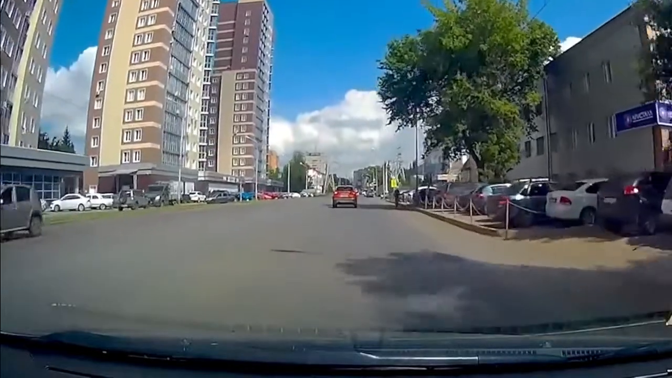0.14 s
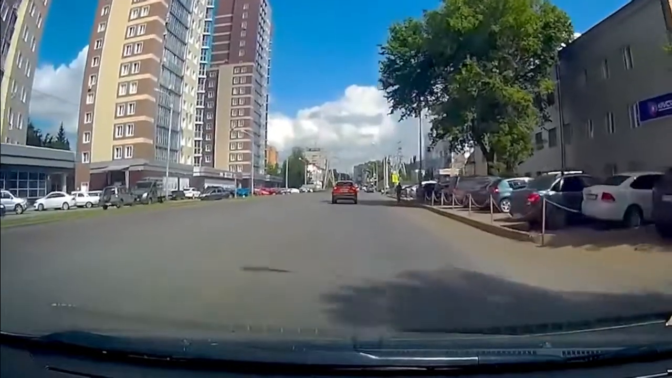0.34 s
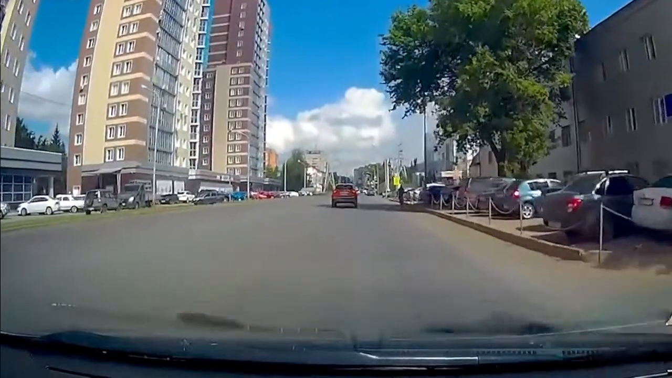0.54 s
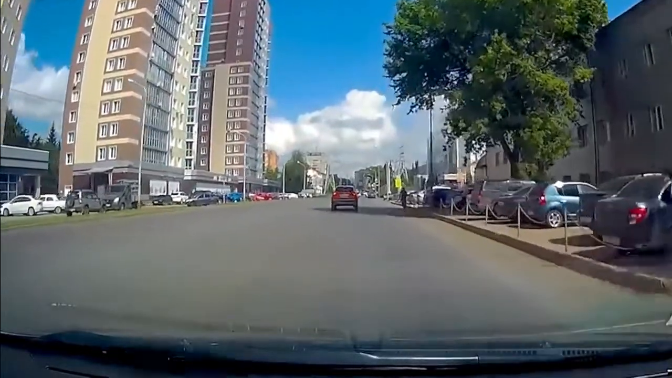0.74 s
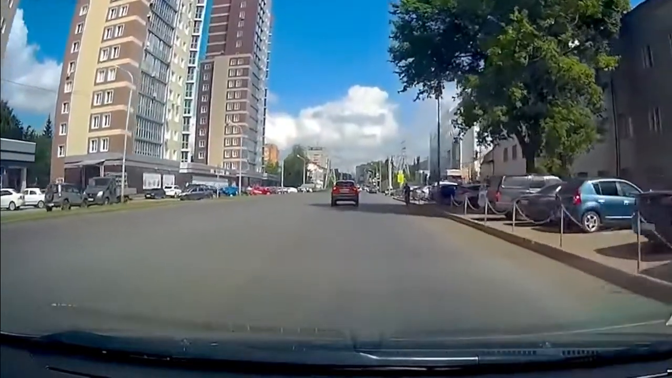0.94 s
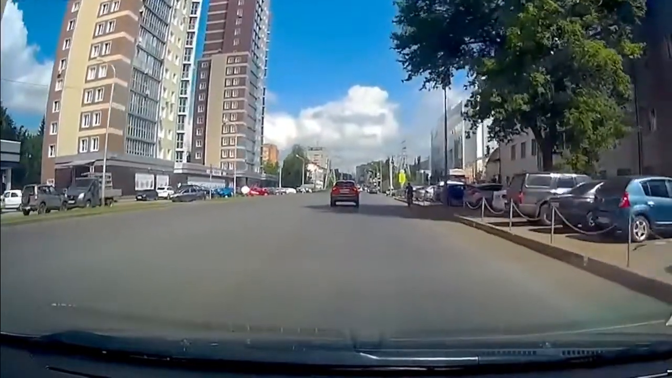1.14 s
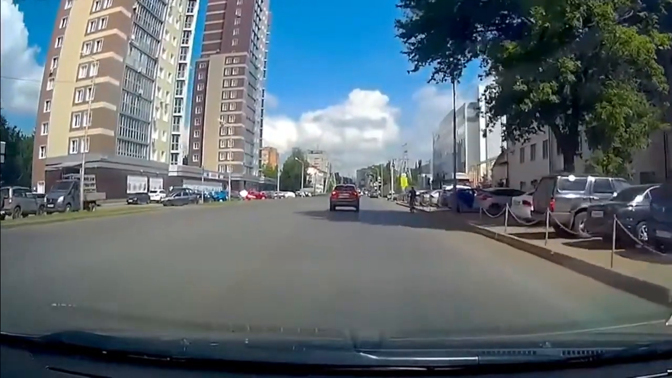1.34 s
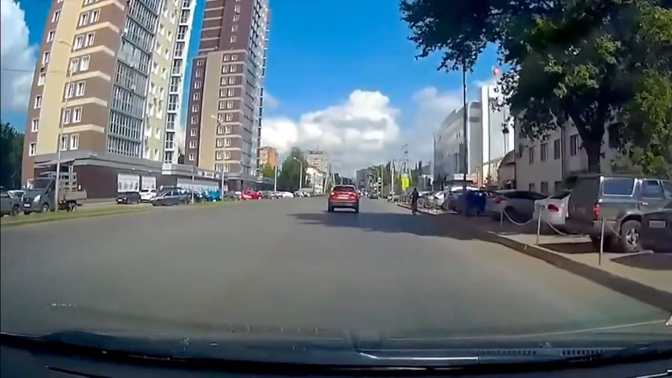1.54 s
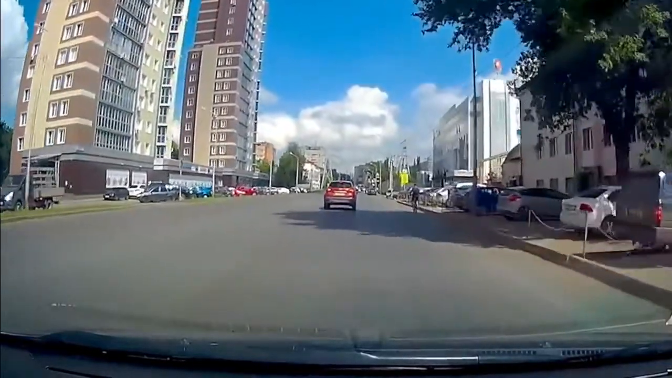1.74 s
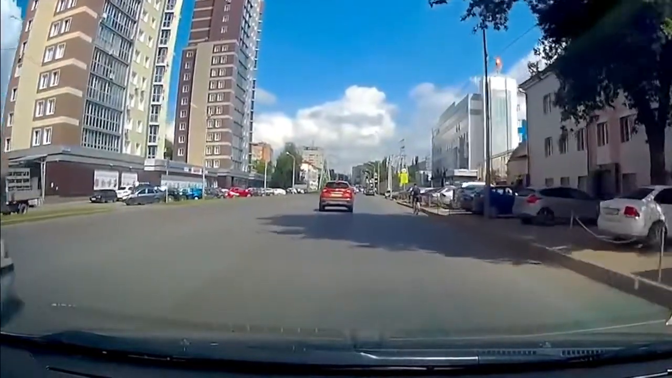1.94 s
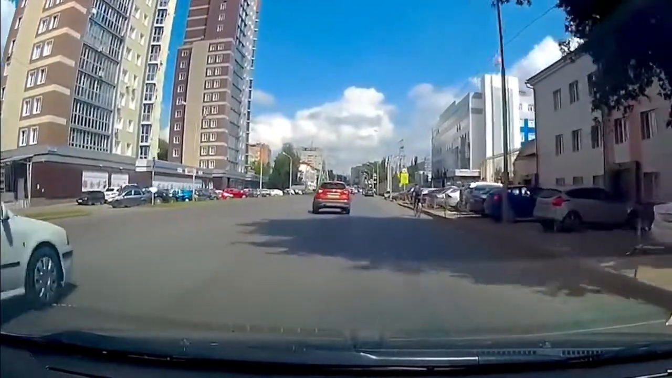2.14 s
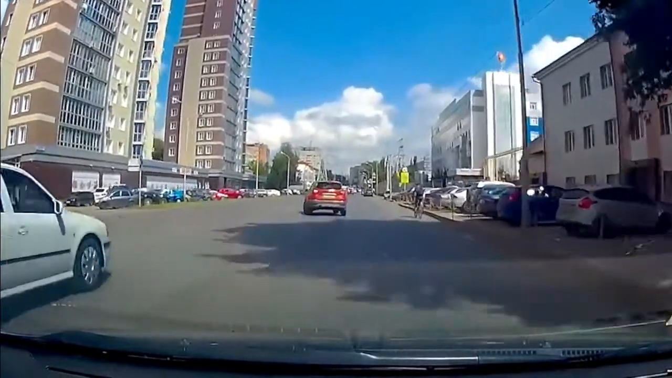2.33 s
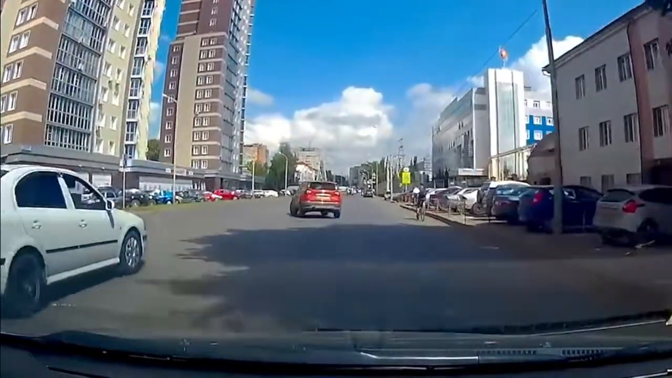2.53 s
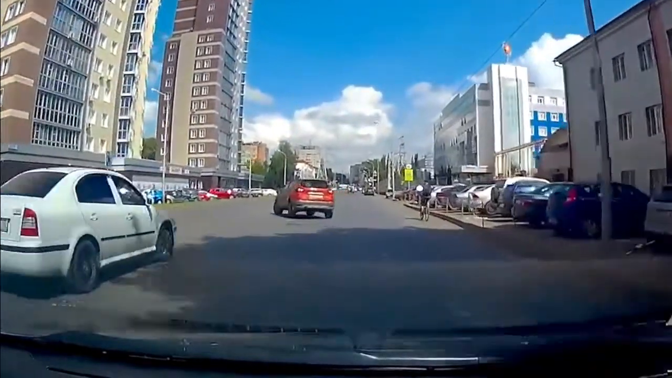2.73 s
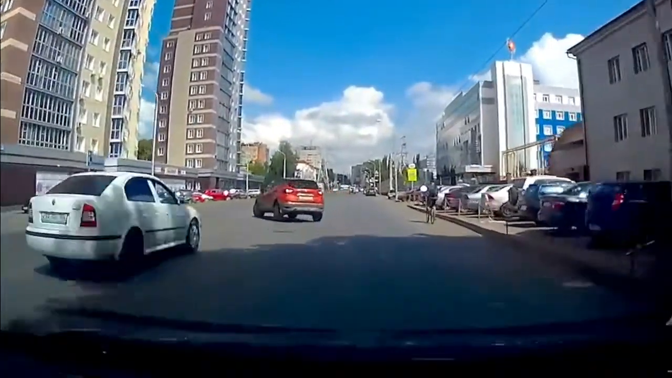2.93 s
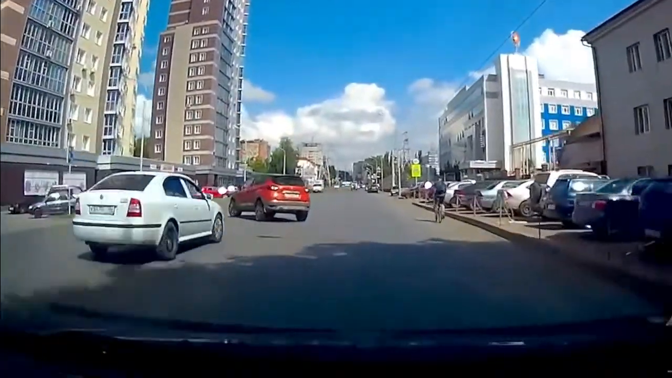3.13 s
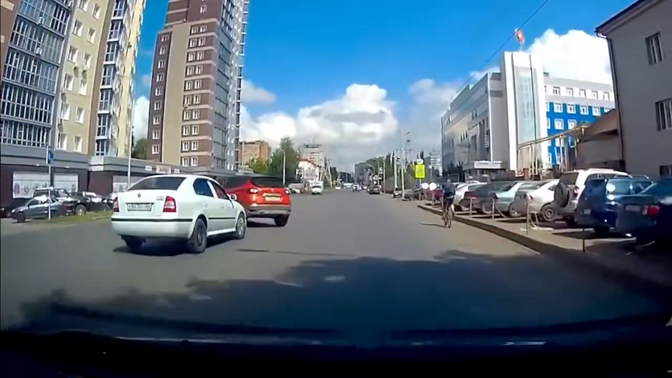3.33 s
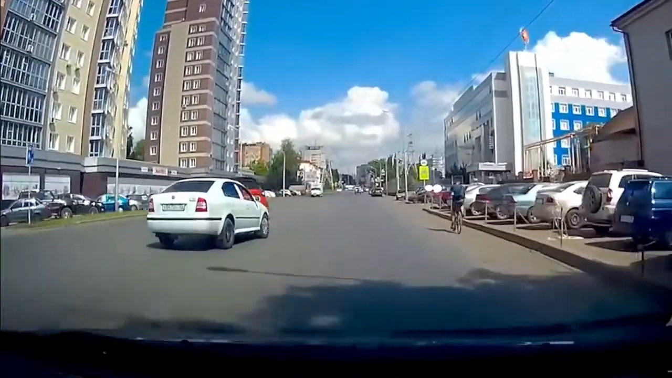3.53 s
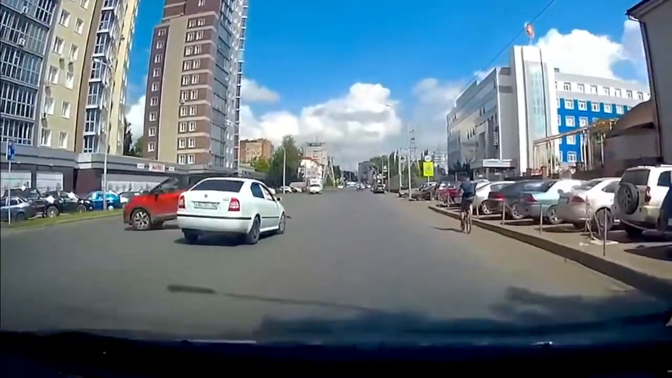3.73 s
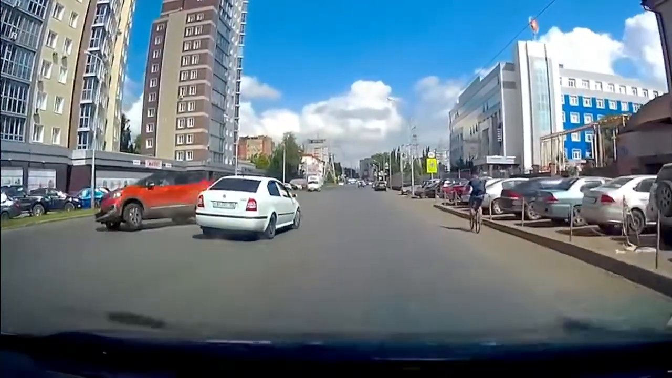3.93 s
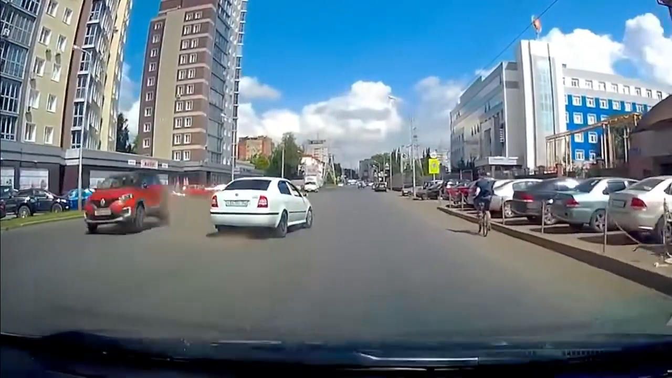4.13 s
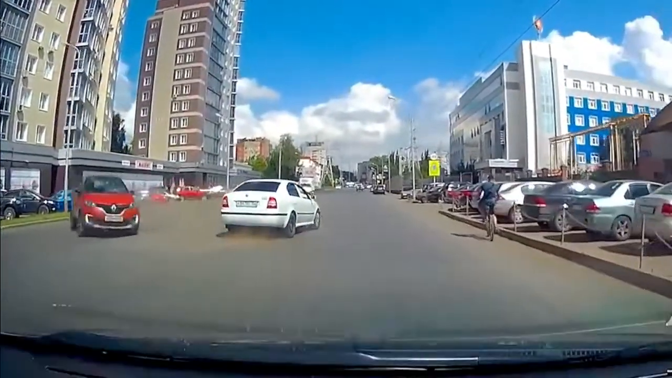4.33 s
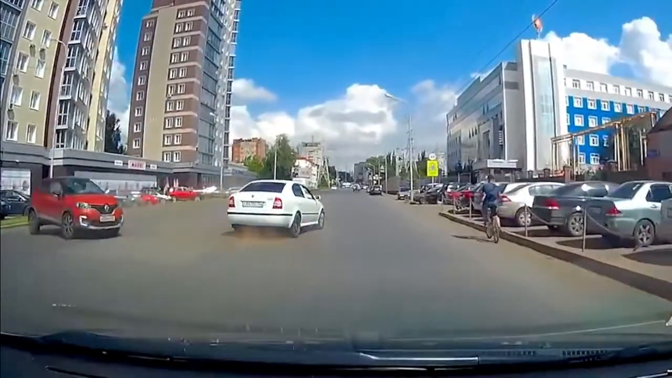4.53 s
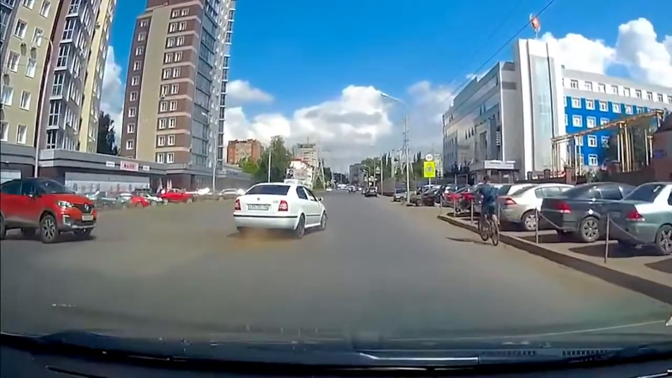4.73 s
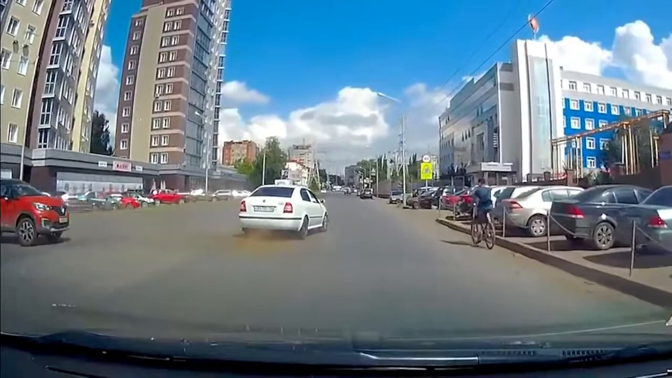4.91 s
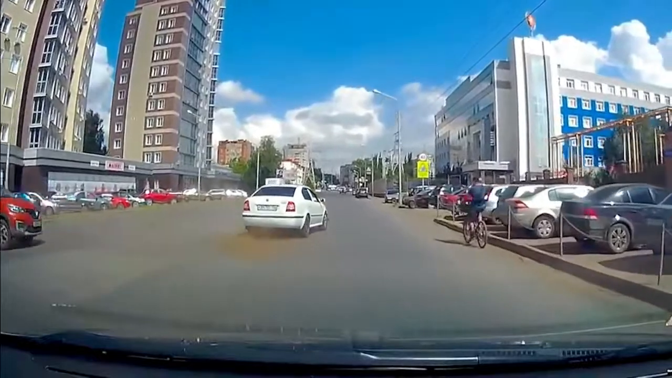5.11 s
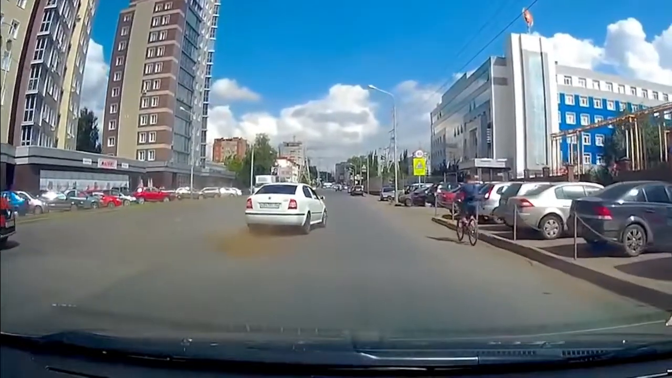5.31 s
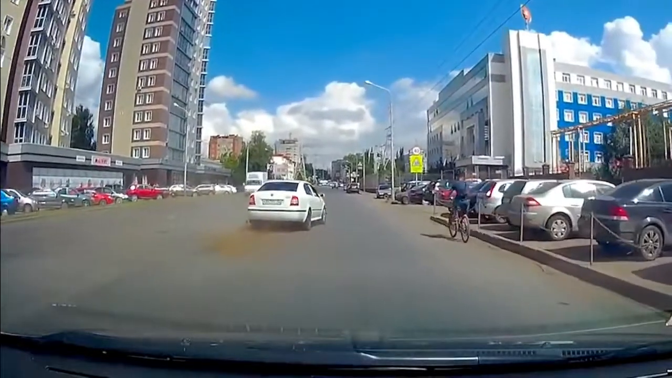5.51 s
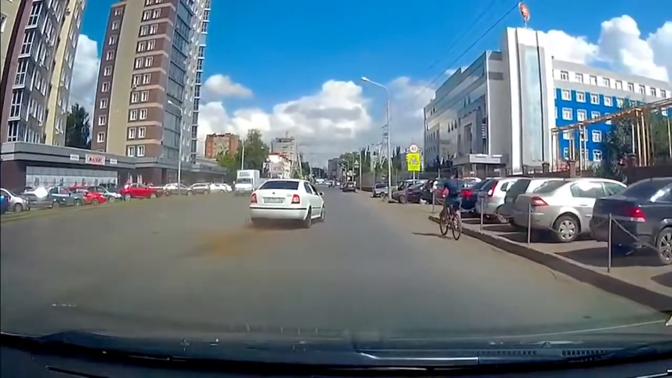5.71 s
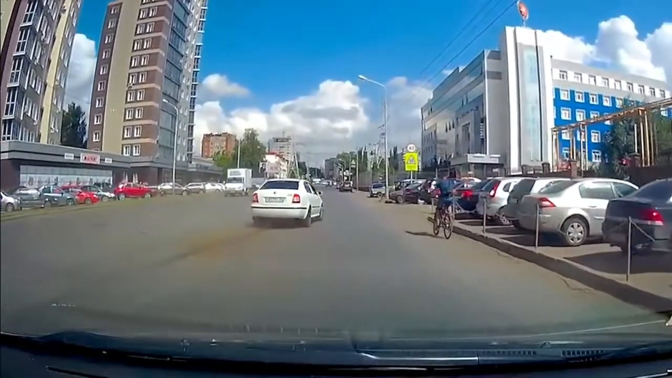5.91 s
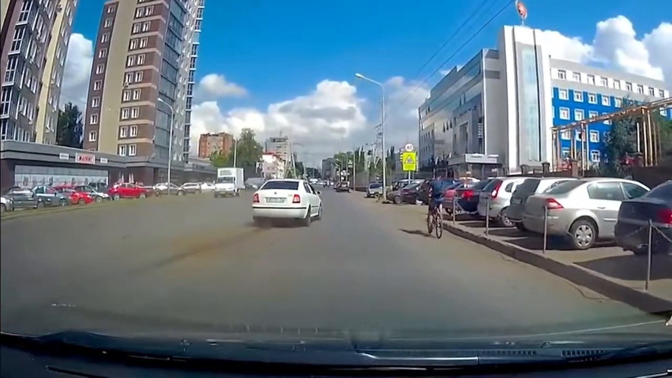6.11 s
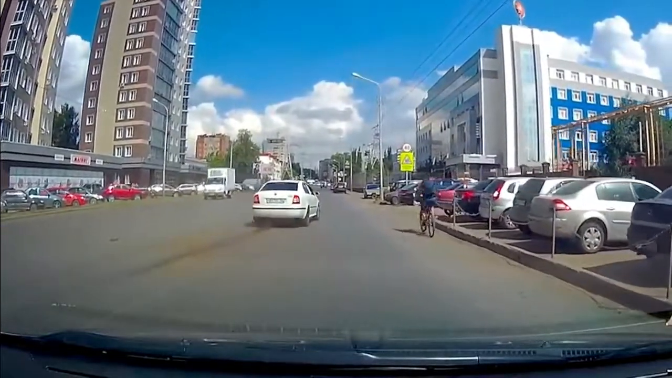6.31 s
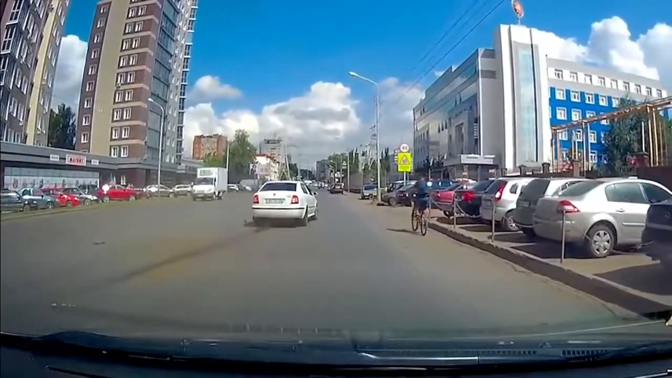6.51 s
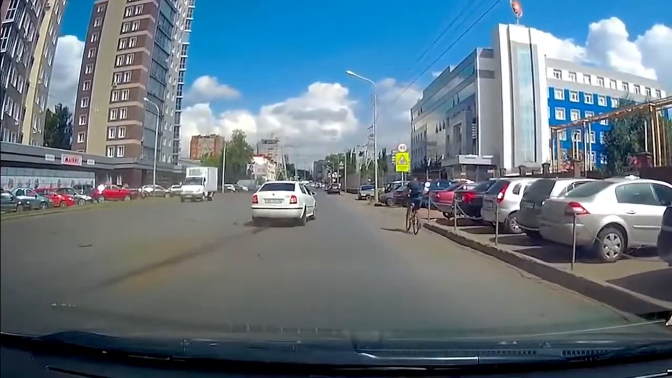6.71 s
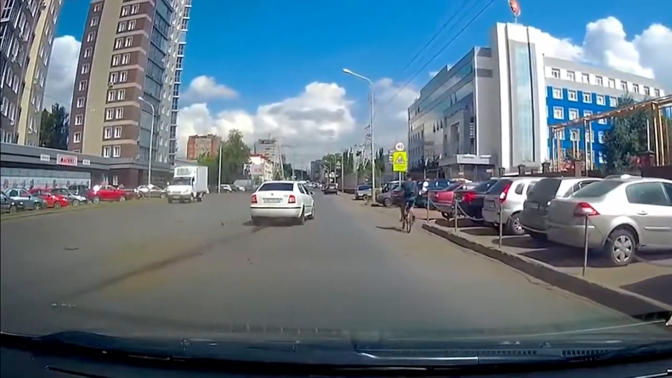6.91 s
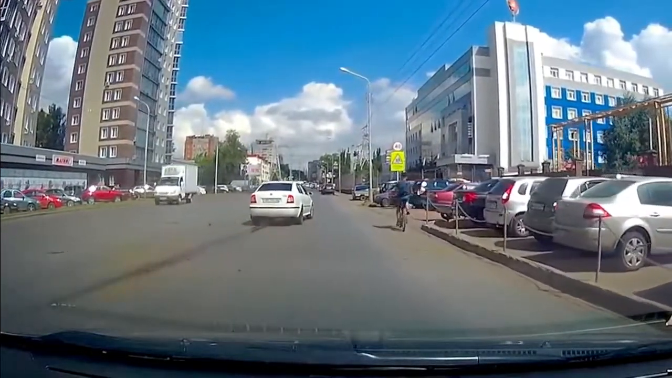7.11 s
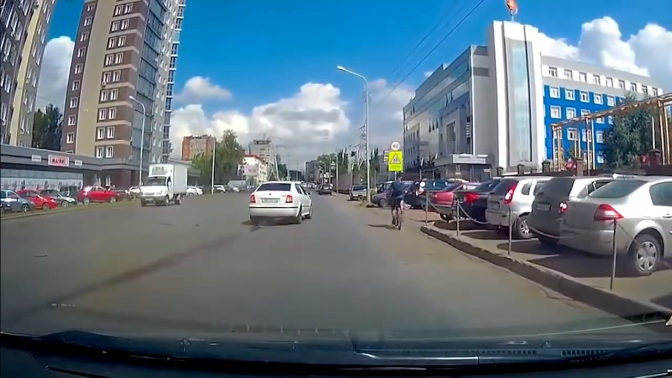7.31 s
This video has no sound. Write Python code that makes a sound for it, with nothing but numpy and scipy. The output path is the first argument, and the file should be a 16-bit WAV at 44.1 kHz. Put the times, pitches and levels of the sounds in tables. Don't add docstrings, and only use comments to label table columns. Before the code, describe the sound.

City street through a windscreen. Steady cabin boom and road noise swell as another car passes, then a thin high squeal leads straight into a heavy crunching impact. Rough, wavering tyre shrieks follow as a car spins, with small fragments clattering and ringing over the road. A last skid fades; our road noise drops to a soft idle, microphone hiss and a faint pulsing brake whine.

```python
import sys
import numpy as np
from scipy import signal
from scipy.fft import rfft, irfft, next_fast_len
from scipy.io import wavfile
from scipy.ndimage import uniform_filter1d, map_coordinates

SR = 44100
rng = np.random.default_rng(int(sys.argv[2]) if len(sys.argv) > 2 else 0)


def to_wav(s):
    ch = np.atleast_2d(s).T
    pcm = np.round(np.clip(ch, -1, 1) * 32767)
    wavfile.write(sys.argv[1], SR, pcm.astype(np.int16))


def linear_from_db(decibels):
    return 10 ** (np.asarray(decibels, float) / 20)


N = 324261

# start_s, pitch_hz, level_db
LOCKED_TYRES = [
    [(3.22, 2170, -52), (3.26, 2070, -41), (3.31, 2000, -39), (3.37, 1960, -39.5), (3.42, 1870, -39),
     (3.5, 1880, -46), (3.68, 1920, -51)],
    [(3.245, 1780, -43), (3.3, 1700, -38), (3.36, 1620, -37), (3.44, 1620, -37.5), (3.52, 1590, -45),
     (3.68, 1630, -48)],
    [(5.0, 1068, -35), (5.13, 1100, -29), (5.24, 1125, -31), (5.32, 1100, -38), (5.6, 1114, -51),
     (5.95, 1101, -62)],
]
# second_partial_db, pitch_scatter_share
LOCKED_TONES = [(-9, .048), (-30, .034), (-30, .06)]
# start_s, length_s, first_hz, last_hz, level_db
SHRILL_CHIRPS = [(3.875, .06, 1100, 1035, -36), (3.925, .05, 1120, 1080, -41), (3.96, .07, 625, 680, -36),
                 (4.15, .07, 640, 670, -31), (4.18, .095, 860, 805, -30), (4.235, .125, 790, 840, -28),
                 (4.53, .065, 845, 890, -33)]
HARSH_CHIRPS = [(4.09, .06, 790, 820, -27), (4.4, .13, 860, 900, -31), (4.02, .12, 690, 810, -30),
                (4.29, .06, 840, 860, -31), (4.355, .04, 1060, 1100, -30), (4.59, .15, 925, 1025, -21),
                (4.73, .085, 945, 915, -26), (4.86, .11, 950, 1050, -28)]
PURE_CHIRPS = [(3.585, .05, 607, 594, -42), (3.885, .03, 1050, 1040, -26), (3.96, .08, 1040, 1020, -27),
               (4.025, .105, 1035, 1050, -25), (4.345, .055, 1000, 1020, -23), (4.48, .1, 1055, 980, -25),
               (4.57, .2, 955, 1010, -19), (4.74, .08, 1070, 1050, -26), (4.845, .065, 945, 995, -23.5),
               (4.915, .055, 1020, 1060, -23), (4.95, .1, 1240, 1310, -31), (5.03, .09, 1290, 1170, -31),
               (5.1, .06, 1070, 1060, -27), (5.16, .1, 1110, 1140, -28)]
# start_s, length_s, first_hz, last_hz, level_db
THIN_CHIRPS = [(4.79, .09, 1065, 1105, -38), (4.95, .14, 1100, 1095, -39), (5.06, .18, 1105, 1135, -34)]
# pitch_hz, gain_db
WINDSCREEN = [(500, 2), (1000, 0.5), (1400, 3), (1700, 1), (2000, -5.5), (2230, 5.5), (2420, -5.5),
              (3220, 1.5), (3600, -5), (4000, 5), (4450, -5.5), (6000, -3)]
# pitch_hz, level_db_per_hz
SCRUB_LOW = [(420, -42.5), (560, -11), (680, -9.5), (820, 2), (950, -11.5), (1200, -57.5)]
SCRUB_HIGH = [(500, -47.5), (850, -23), (990, -2), (1050, 3.5), (1180, -7.5), (1320, -11), (1580, -21),
              (2190, -29.5), (2400, -47.5), (3120, -73.5), (5280, -120)]
# start_s, peak_db
BLOWS = [
    (3.698, -16),
    (3.707, -8),
    (3.711, -6),
    (3.737, -7),
    (3.751, -5),
    (3.778, -11),
    (3.784, -19),
    (3.799, -12),
    (3.822, -15),
]
# pitch_hz, level_db_per_hz
PANEL = [(35, -31), (60, 10), (86, -3), (182, 6.5), (209, -0.5), (295, -3), (409, -2), (449, -19),
         (501, -7), (695, -13), (788, -6), (1060, -5.5), (2500, -33.5), (3250, -62), (5500, -120)]
# pitch_hz, level_db_per_hz
SHATTER = [(1290, -35), (2200, -4), (2390, -10), (3280, -2), (3710, -6), (4030, -3.5), (4630, -14.5),
           (5960, -9), (6740, -20), (7320, -12.5), (8900, -24), (10100, -21.5), (15500, -40)]
# start_s, peak_db, hollow_knock_db
LANDINGS = [(2.929, -57, 6), (3.5874, -52, 18), (3.9788, -45.5, 14), (4.0596, -47.5, 17), (4.1592, -47, 9),
            (4.1797, -46, 13), (4.1953, -44.5, 12), (4.212, -47, 8), (4.3202, -49, 8), (4.3574, -46.5, 14),
            (4.375, -48, 10), (4.4448, -44, -1), (4.4587, -46, 12), (4.475, -48, 12), (4.5194, -47, 14),
            (4.627, -50, 12), (4.764, -47, 10), (4.781, -51, 5), (4.8302, -45, 6), (4.85, -49, 4),
            (4.935, -53, 4), (5.025, -50, 4), (5.0477, -49, 10), (5.074, -50, 4), (5.1303, -52, 2),
            (5.1914, -51, 4), (5.238, -51, -13), (5.257, -51, 0), (5.333, -49.5, -9), (5.4164, -51.5, -2),
            (5.454, -55.5, -2), (5.5354, -51, 23), (5.5928, -52, -7), (5.655, -58, 22), (5.7012, -53.5, 1),
            (5.715, -60, 26), (5.7474, -58.5, 24), (5.8315, -57, 1), (6.0314, -60, -2)]
# start_s, peak_db, pitch_hz
RINGING_PARTS = [(3.979, -47, 3240), (4.159, -33, 3210), (4.18, -38, 3800), (4.32, -42, 3210),
                 (4.357, -41, 3320), (4.61, -44, 3800), (4.98, -45, 3200), (5.027, -40, 3250),
                 (5.081, -42, 3210), (5.195, -45, 3750), (5.257, -41, 3250), (5.336, -40, 3220),
                 (5.355, -48, 3950), (5.385, -48, 3900), (5.416, -47, 3150), (5.497, -48, 3216),
                 (5.54, -47, 4100), (5.593, -44, 3220), (5.625, -51, 3110), (5.793, -48, 3930),
                 (5.82, -53, 3400), (5.825, -50, 3900), (5.975, -53, 3950), (6.015, -53, 3970),
                 (6.169, -57, 3940)]
# pitch_hz, level_db_per_hz
GRIT = [(1410, -35), (2400, -6), (3210, -6), (3950, -5), (4550, -12), (6000, -10), (6680, -18),
        (7390, -12.5), (12000, -37), (15600, -63), (22000, -120)]
# start_s, tyre_roar_db
PASSING_CAR = [(0, -41), (.72, -34), (1.0, -32), (1.2, -32), (1.41, -29.5), (2.0, -31), (2.2, -36),
               (2.52, -37.5), (3.1, -45)]
# start_s, speed_db
SPEED = [(0, 19), (1.2, 18), (1.76, 19.5), (2.3, 18.5), (3.17, 19), (3.64, 13), (3.97, 15), (4.4, 10),
         (5.1, 8), (5.57, 3.5), (6.0, 3), (6.37, 0), (7.35, 0)]
# pitch_hz, level_db_per_hz
TREAD = [(300, -33), (400, -4), (474, -14.5), (601, 4.5), (695, -2.5), (829, 3), (1020, 5.5), (1130, 1),
         (1290, 5.5), (1450, -1.5), (1650, -0.5), (1850, -9), (2230, -16.5), (2420, -59.5)]
# pitch_hz, level_db_per_hz
SIZZLE = [(1290, -19.5), (2200, -0.5), (2410, -5), (2840, -7.5), (2980, -9), (3240, -8.5), (3970, -10.5),
          (4460, -19), (5040, -23), (5660, -18.5), (6570, -27.5), (7000, -26.5), (9100, -59), (15400, -120)]
# pitch_hz, level_db_per_hz
RUMBLE = [(9, -39), (15, 0.5), (43, 7.5), (58, -2.5), (72, -18.5), (110, -67)]
# pitch_hz, level_db_per_hz
BOOM = [(45, -36.5), (68, 1.5), (105, -2.5), (140, -1), (190, -4), (319, -9), (418, -12.5), (466, -21),
        (500, -16), (650, -39), (1100, -120)]
# pitch_hz, level_db_per_hz
DRONE = [(90, -56), (118, -9), (143, 6), (172, -4.5), (230, -78.5)]
# pitch_hz, level_db_per_hz
IDLE = [(40, -40), (60, -2), (100, 3.5), (125, -8.5), (170, -47.5)]
# centre_s, lift_db
ROUGH_PATCHES = [(0.02, 13), (.16, 8), (.3, 9), (1.14, 9), (1.3, 10), (1.86, 8), (2.15, 5), (2.45, 9),
                 (2.87, 14), (3.17, 7), (3.6, 7), (4.13, 10), (4.49, 9), (5.0, 7), (5.57, 9), (6.02, 11),
                 (6.78, 10), (7.14, 7)]
# full_from_s, level_db, hold_s, rise_db_per_s, fall_db_per_s
LURCHES = [
    (0.0, -23, .01, 40, 40),
    (5.08, -27, .18, 60, 50),
    (7.14, -36.5, .3, 35, 30),
]
# start_s, peak_db, pitch_hz, fade_60db_s
ROAD_JOINTS = [
    (1.101, -3.5, 38, 0.086),
    (1.271, -9, 41.5, 0.26),
    (2.859, -15, 34.8, 0.11),
    (3.129, -12, 54.4, 0.23),
    (4.96, -12.5, 40.8, 0.12),
]
# start_s, level_db
BRAKE_PRESSURE = [
    (5.85, -64),
    (6.05, -65),
    (6.3, -62),
    (6.55, -59.5),
    (7.35, -59),
]
# pitch_hz, level_db_per_hz
HISS = [(1290, -41.5), (2200, -18), (5280, -10), (5960, -11), (6470, -16.5), (7500, -9), (7870, -7),
        (8550, -12), (14100, -15), (15000, -15), (15500, -19), (15800, -60)]
# pitch_hz, level_db
WHINE = [
    (7843, -95),
    (7903, -80.5),
    (7962, -83),
    (8021, -104),
]


def unit(x):
    return x / np.sqrt(np.mean(x ** 2) + 1e-20)


def curves(rows, span=slice(None)):
    s, *columns = np.transpose(rows)
    return [np.interp(np.arange(N)[span] / SR, s, column) for column in columns]


def wobble(rate, size=N):
    knots = rng.standard_normal(int(size * rate / SR) + 4)
    return map_coordinates(knots, [np.arange(size) * rate / SR])


def swell(s, db, hold, rise, fall):
    t = np.arange(N) / SR
    return db - rise * np.clip(s - t, 0, None) - fall * np.clip(t - s - hold, 0, None)


def coloured(x, spectrum):
    m = next_fast_len(N + 8192)
    hz, level = np.transpose(spectrum)
    gain = linear_from_db(np.interp(np.log(np.fft.rfftfreq(m, 1 / SR) + 1), np.log(hz + 1), level))
    return unit(irfft(rfft(x, m) * gain, m)[:N])


def steady(spectrum):
    return coloured(rng.standard_normal(N), spectrum)


def rush(spectrum, patchy_db):
    z = signal.stft(rng.standard_normal(N), nperseg=512)[2]
    field = uniform_filter1d(rng.standard_normal(z.shape), 5, 0)
    field = unit(uniform_filter1d(field, 10, 1))
    noise = signal.istft(z * linear_from_db(patchy_db * field), nperseg=512)[1][:N]
    return coloured(noise, spectrum)


def power_sum(*gains):
    return np.sqrt(sum(g ** 2 for g in gains))


def with_speed(crawl_db, per_db):
    return linear_from_db(crawl_db + per_db * curves(SPEED)[0])


def street(x, t60):
    t = np.arange(SR // 3) / SR
    tail = rng.standard_normal(len(t)) * linear_from_db(-60 * t / t60) * (t > .012)
    return signal.fftconvolve(x, tail / np.linalg.norm(tail))[:N]


def chirp(s, length, first_hz, last_hz, db):
    shape = [(0, 10), (.3, 0), (.75, 0), (1, 10)]
    return [(s + u * length, first_hz + u * (last_hz - first_hz), db - drop_db) for u, drop_db in shape]


def sliding_tyre(rows, second_db, scatter):
    start_s, end_s = rows[0][0], rows[-1][0]
    span = slice(round(start_s * SR), round(end_s * SR))
    hz, first_db = curves(rows, span)
    size = len(hz)
    over_db = first_db + second_db + 1.2 * (first_db - first_db.max()) + 1.5 * wobble(30, size)
    total = np.zeros(size)
    for patch in (-1, 0, 1):
        drift = scatter * (patch * np.abs(wobble(14, size)) + .55 * wobble(200, size))
        turn = 2 * np.pi * np.cumsum(hz * (1 + drift)) / SR
        flutter = unit(linear_from_db(1.9 * wobble(60, size))) * linear_from_db(-5.5 * abs(patch) - 1.9)
        tone = linear_from_db(first_db) * np.sin(turn) + linear_from_db(over_db + 0.5) * np.sin(2 * turn)
        tone += linear_from_db(over_db - 16) * np.sin(3 * turn) + linear_from_db(over_db - 29.5) * np.sin(4 * turn)
        total += flutter * tone
    t = np.arange(span.start, span.stop) / SR
    fade = np.clip(np.minimum(t - start_s, end_s - t) / 0.012, 0, 1)
    return span, np.sqrt(2) * fade * total


def squeal():
    slides = list(zip(LOCKED_TYRES, LOCKED_TONES))
    kinds = [(SHRILL_CHIRPS, (0, .018)), (HARSH_CHIRPS, (-12, .028)),
             (PURE_CHIRPS, (-26, .026)), (THIN_CHIRPS, (-16, .012))]
    for table, tone in kinds:
        slides += [(chirp(*row), tone) for row in table]
    out = np.zeros(N)
    for rows, (second_db, scatter) in slides:
        span, tone = sliding_tyre(rows, second_db, scatter)
        out[span] += tone
    return np.std(out) * coloured(out + linear_from_db(-7) * street(out, t60=0.42), WINDSCREEN)


def scrub():
    low_db = swell(4.13, -29.5, .05, 50, 36) + 1.3 * wobble(25)
    high_db = swell(4.62, -30.5, .36, 10, 36) + 0.52 * wobble(25)
    noise = linear_from_db(low_db) * rush(SCRUB_LOW, patchy_db=-0.5)
    noise += linear_from_db(high_db) * rush(SCRUB_HIGH, patchy_db=2.0)
    return np.clip((np.arange(N) / SR - 3.705) / .15, 0, 1) * noise


def crash():
    force = 0.65 * rng.standard_normal(N)
    t = np.arange(SR // 20) / SR
    for s, db in BLOWS:
        blow = linear_from_db(db + 14 - 60 * t / .04) * (1 - np.exp(-t / .002))
        force[round(s * SR):][:len(t)] += blow * rng.standard_normal(len(t))
    force = force / np.sqrt(uniform_filter1d(force ** 2, 2600) + 1e-9)
    hz, level = np.transpose(PANEL)
    thud = coloured(force, np.transpose([hz, level - 30 * (hz > 470)]))
    fold = coloured(force, np.transpose([hz, level - 30 * (hz < 430)]))
    shards = coloured(rng.standard_normal(N) * linear_from_db(1.5 * wobble(250)), SHATTER)
    out = linear_from_db(swell(3.705, -19.5, .06, 450, 90)) * thud
    out += linear_from_db(swell(3.708, -22.5, .06, 500, 105)) * fold
    return out + linear_from_db(swell(3.742, -40, .05, 320, 90)) * shards


def debris():
    scrape, ring = np.zeros(N), np.zeros(N)
    t = np.arange(SR // 8) / SR
    size = len(t)
    rise = 1 - np.exp(-t / .002)
    chips = [(3.95 + u * 2.25, -52 - 8 * u - 8 * smallness, 0)
             for u, smallness in rng.uniform(size=(110, 2))]
    for s, db, knock_db in LANDINGS + chips:
        grit = unit(linear_from_db(2 * wobble(300, size)) * rng.standard_normal(size))
        knock = np.sin(2 * np.pi * 1670 * t + 1.3 * wobble(150, size))
        scrape[round(s * SR):][:size] += rise * linear_from_db(db - 60 * t / 0.085) * grit
        ring[round(s * SR):][:size] += rise * linear_from_db(db + knock_db - 7.5 - 60 * t / .05) * knock
    for s, db, hz in RINGING_PARTS:
        turn = 2 * np.pi * hz * t + 1.1 * wobble(110, size)
        ring[round(s * SR):][:size] += rise * linear_from_db(db - 6 - 60 * t / .085) * np.sin(turn)
    hits = linear_from_db(-.6) * np.std(scrape) * coloured(scrape, GRIT) + ring
    return hits + linear_from_db(-8.5) * street(hits, t60=0.15)


def tyre_roar():
    near_db = curves(PASSING_CAR + [(4.6, -85)])[0]
    drag = linear_from_db(swell(4.2, -31, .12, 22, 40))
    roar = power_sum(with_speed(-55.3, .82), linear_from_db(near_db), drag)
    passing_sizzle = linear_from_db(-48.5 + 1.05 * (near_db - near_db.max()))
    crash_dust = linear_from_db(swell(3.8, -48.5, .45, 200, 9.5))
    brake_dust = linear_from_db(swell(3.4, -54, .06, 35, 30))
    sizzle = power_sum(with_speed(-77, .78), passing_sizzle, crash_dust, brake_dust)
    out = roar * linear_from_db(.4 * wobble(9)) * rush(TREAD, patchy_db=1.5)
    return out + sizzle * linear_from_db(.4 * wobble(9)) * rush(SIZZLE, patchy_db=1.5)


def cabin():
    t = np.arange(N) / SR
    rough_db = sum(db * np.exp(-((t - s) / .07) ** 2) for s, db in ROUGH_PATCHES)
    lurches = [linear_from_db(swell(*row)) for row in LURCHES]
    rumble = power_sum(with_speed(-43, .88) * linear_from_db(1.5 * wobble(6)), *lurches)
    out = rumble * steady(RUMBLE)
    out += with_speed(-48, 1.01) * linear_from_db(0.4 * wobble(8.6)) * steady(BOOM)
    out += with_speed(-53, .88) * linear_from_db(rough_db) * steady(DRONE)
    return out + linear_from_db(-46) * steady(IDLE)


def road_joints():
    out = np.zeros(N)
    t = np.arange(SR // 4) / SR
    for s, db, hz, t60 in ROAD_JOINTS:
        strength = linear_from_db(db + 3.5 - 60 * t / t60) * (1 - np.exp(-t / 0.012))
        out[round(s * SR):][:len(t)] += strength * np.sin(2 * np.pi * hz * t)
    return out


def brake():
    t, period_s = np.arange(N) / SR, .2238
    since = (t - 6.04) % period_s
    lift = np.exp(-(since / .075) ** 1.5) * (1 - np.exp(-since / .004))
    turn = 2 * np.pi * np.cumsum(1779 + 36 * lift + 1.5 * wobble(12)) / SR
    sag_db = 5 * np.exp((since - period_s) / .02)
    level_db = curves(BRAKE_PRESSURE)[0] + 5 * lift - sag_db + 1.3 * wobble(25)
    fade_in = np.clip((t - BRAKE_PRESSURE[0][0]) / 0.09, 0, 1)
    return fade_in * linear_from_db(level_db) * np.sin(turn)


def scene():
    outside = squeal() + scrub() + crash() + debris()
    return (outside + tyre_roar() + cabin() + road_joints() + brake())[None]


def top_cut(x):
    return signal.sosfilt(signal.butter(12, 15670, fs=SR, output="sos"), x)


def record(dry):
    t = np.arange(N) / SR
    whine = sum(np.sqrt(2) * linear_from_db(db) * np.sin(2 * np.pi * hz * t) for hz, db in WHINE)
    hiss = linear_from_db(-72.5) * steady(HISS)
    rounded = dry / (1 + np.abs(dry / .65) ** 4) ** (1 / 4)
    return top_cut(rounded + hiss + whine)


dry = scene()
out = record(dry)
to_wav(out)
```